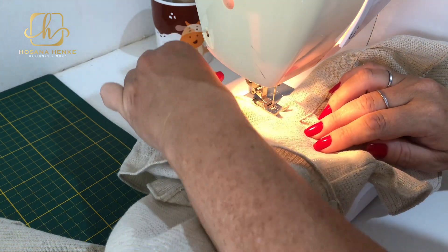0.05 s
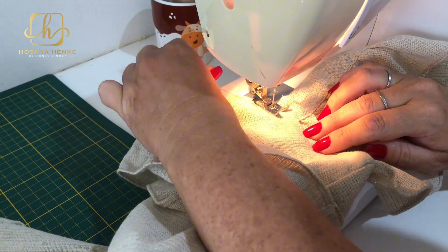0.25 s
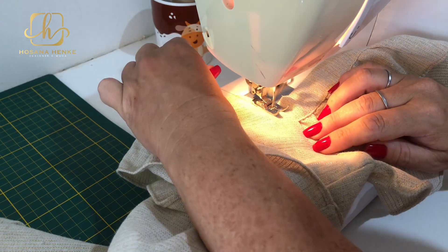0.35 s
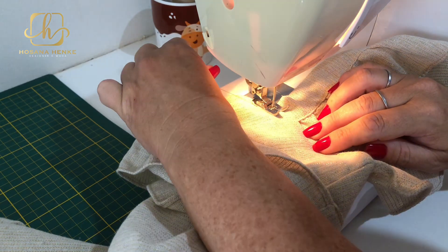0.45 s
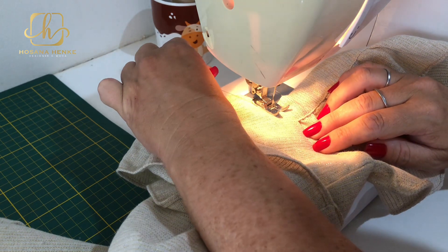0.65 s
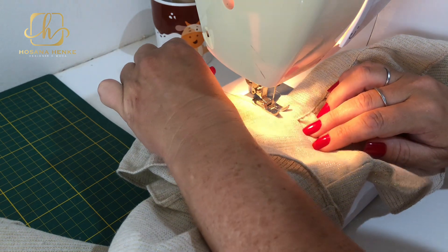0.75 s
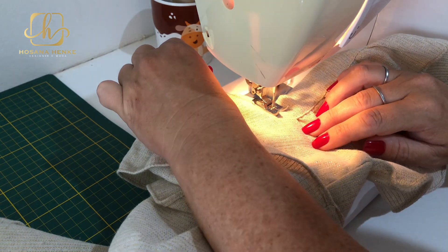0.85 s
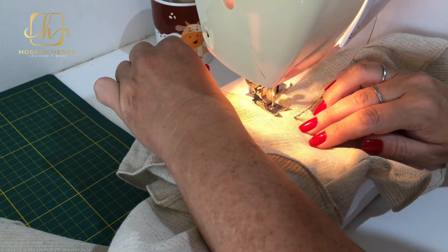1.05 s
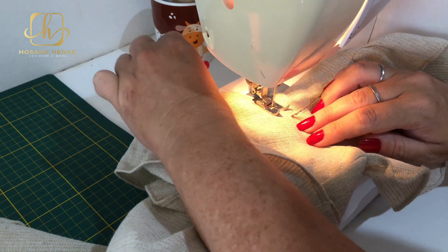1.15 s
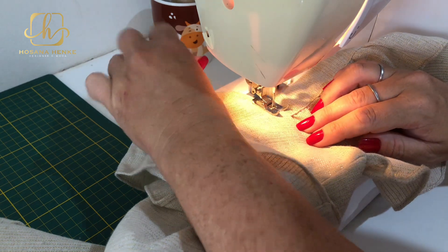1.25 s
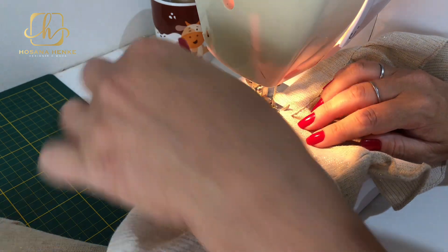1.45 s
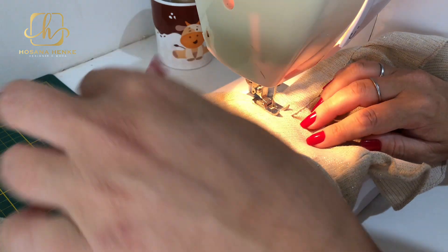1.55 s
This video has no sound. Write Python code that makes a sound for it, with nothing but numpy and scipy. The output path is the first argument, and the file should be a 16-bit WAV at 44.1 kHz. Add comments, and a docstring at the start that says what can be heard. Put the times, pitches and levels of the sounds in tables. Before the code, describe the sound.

Close up in a small room, a sewing machine sews two short bursts, its gears rattling and the table rumbling. The second burst starts with a tiny squeak and adds quick needle clacks and fabric hiss before slowing.

```python
"""A domestic sewing machine on a table sews two short runs, close by in a small room.
It hums at rest; in a run the drive shakes the table, gears chatter in the plastic housing,
the motor whines and fabric rubs. The feed knocks, the linkage clicks and small steel parts tick.
In the second run a dry bearing squeaks and the needle bar clacks, about ten stitches a second."""
import sys
import numpy as np
from scipy import signal
from scipy.fft import rfft, irfft, next_fast_len
from scipy.io import wavfile
from scipy.ndimage import uniform_filter1d, map_coordinates

SR = 44100
rng = np.random.default_rng(int(sys.argv[2]) if len(sys.argv) > 2 else 0)


def digitize_waveform(pressure):
    """Quantize a signal to 16-bit integers and store it at the path in sys.argv[1].

    Rows of a 2-D input are taken as channels; values are limited to [-1, 1].
    """
    field = np.atleast_2d(pressure).T
    bounded = np.clip(field, -1, 1)
    quanta = np.round(bounded * 32767).astype(np.int16)
    wavfile.write(sys.argv[1], SR, quanta)


N = 70560  # 1.6 s


def amp(db):
    """Decibels to gain."""
    return 10 ** (np.asarray(db) / 20)


def unit(x):
    """Scale to rms 1."""
    return x / np.sqrt(np.mean(x ** 2) + 1e-20)


def along(points, hz):
    """Read (freq_hz, value) points on a log axis."""
    freqs, values = np.transpose(points)
    return np.interp(np.log(hz + 1), np.log(freqs + 1), values)


def fader(rows):
    """Gain per sample from (time_s, level_db) rows: silent before, fading after."""
    times, db = np.transpose(rows)
    t = np.arange(N) / SR
    return amp(np.interp(t, times, db, left=-120) - 150 * np.maximum(t - times[-1], 0))


def wobble(rate_hz):
    """A smooth random curve."""
    points = rng.standard_normal(int(N * rate_hz / SR) + 4)
    return map_coordinates(points, [np.arange(N) * rate_hz / SR])


def tone(pitch_hz):
    """A sine of rms 1 that follows a pitch per sample."""
    return np.sqrt(2) * np.sin(2 * np.pi * np.cumsum(pitch_hz) / SR)


def filtered(x, response):
    """Filter x by a gain per frequency."""
    size = next_fast_len(len(x) + SR // 4)
    return irfft(rfft(x, size) * response(np.fft.rfftfreq(size, 1 / SR)), size)[:len(x)]


def eq(x, points):
    """Shape x with (freq_hz, gain_db) points."""
    return filtered(x, lambda f: amp(along(points, f)))


def ring(x, modes):
    """Pass x through a body's resonances."""
    def response(f):
        return sum((-1) ** k * amp(db) * 1j * f * width / (hz * hz - f * f + 1j * f * width)
                   for k, (hz, width, db) in enumerate(modes))
    return filtered(x, response)


def contacts(rate_hz, spread_db):
    """Small impacts of uneven size, one at a random moment of each period."""
    slots = np.arange(int(N * rate_hz / SR))
    onsets = ((slots + rng.random(len(slots))) * SR / rate_hz).astype(int)
    sizes = amp(spread_db * rng.standard_normal(len(slots))) * rng.choice([-1, 1], len(slots))
    return np.bincount(onsets, sizes, N)[:N]


def steady(x, window_s):
    """Even out the slow swells of x to rms 1."""
    power = abs(uniform_filter1d(x * x, max(int(window_s * SR), 8)))
    return x / np.sqrt(power + 1e-12)


def burst(attack_s, hold_s, t60_s):
    """The noisy chatter of one blow."""
    t = np.arange(SR // 8) / SR
    envelope = (1 - np.exp(-t / attack_s)) * amp(-60 * np.maximum(t - hold_s, 0) / t60_s)
    return rng.uniform(-0.83, 1, len(t)) * envelope


def struck(modes):
    """One blow on a body's modes, their balance varying from hit to hit."""
    t = np.arange(SR // 4) / SR
    rings = sum(amp(db + rng.normal(0, 0.71)) * np.exp(-np.pi * width * t)
                * np.sin(2 * np.pi * (hz * t + rng.random())) for hz, width, db in modes)
    return rings * (1 - np.exp(-t / 0.0035))


def place(out, start_s, db, blow):
    """Mix in a blow whose energy equals that level held for 10 ms."""
    part = out[round(start_s * SR):][:len(blow)]
    part += (amp(db) * blow * np.sqrt(SR / 100) / np.linalg.norm(blow))[:len(part)]


# resting hum: pitch_hz, level_db
HUM_TONES = [(100, -59.5), (465, -74.5)]
# dark room tone: freq_hz, gain_db
ROOM_TONE_EQ = [(30, -10), (60, 6), (130, 8.5), (200, 2), (470, 3), (2000, -8), (8000, -20.5),
                (14000, -20.5)]
# fader ride on both: time_s, gain_db
IDLE_RIDE = [(0, 1.5), (1.4, -16.5), (1.6, -2.5)]


def idle():
    """Mains hum of the resting machine over a bed of room tone."""
    t = np.arange(N) / SR
    hum = sum(amp(db) * np.sqrt(2) * np.sin(2 * np.pi * hz * t + 0.29 * wobble(9.4))
              for hz, db in HUM_TONES)
    room_tone = amp(-63.5) * unit(eq(rng.standard_normal(N), ROOM_TONE_EQ))
    return fader(IDLE_RIDE) * (hum + room_tone)


# ride on the sliding hiss: time_s, level_db
SLIDE_RIDE = [(0.18, -68), (0.202, -74.5), (0.226, -55.5), (0.258, -61.5), (0.412, -51.5), (0.488, -51),
              (0.5, -57), (.58, -59), (0.63, -72.5), (0.752, -49), (0.856, -49.5), (0.998, -44.5),
              (1.026, -51.5), (1.058, -44), (1.112, -49.5), (1.144, -44), (1.298, -53.5), (1.41, -71),
              (1.6, -80)]
# bright rub: freq_hz, gain_db
RUB_EQ = [(700, -23), (2000, 6.5), (4500, 4.5), (10000, -3.5), (14200, -2)]
# steel jingle: pitch_hz, width_hz, gain_db
JINGLE_MODES = [(4370, 90, 6.5), (4920, 380, 3), (6240, 230, 2.5), (8170, 300, 4.5), (13100, 360, 1)]


def sliding():
    """Gritty hiss of thread and fabric, with small steel parts jingling in it."""
    grit = unit(contacts(rate_hz=3000, spread_db=4.5)) + 0.68 * rng.standard_normal(N)
    jingle = unit(ring(contacts(rate_hz=670, spread_db=4.5), JINGLE_MODES))
    flutter = amp(1.93 * wobble(90.05) + 1.3)
    return fader(SLIDE_RIDE) * flutter * (unit(eq(grit, RUB_EQ)) + amp(-8.5) * jingle)


# clicks as the load is taken up or let go: start_s, level_db
LINKAGE_HITS = [(.2123, -52.5), (.2233, -43), (.2856, -48.5), (.6568, -55), (1.4465, -53)]
# ring of the linkage: pitch_hz, width_hz, gain_db
LINKAGE_MODES = [(348, 31, -8), (483, 13, -2.5), (741, 26, -0.5), (824, 19, -4.5), (1206, 55, 5),
                 (1598, 56, 1), (2432, 33, -1.5), (3020, 44, -5.5), (3558, 63, 3.5)]


def linkage_clicks():
    """Slack in the linkage closes with a click that rings on."""
    out = np.zeros(N)
    for start_s, db in LINKAGE_HITS:
        place(out, start_s, db + 0.5, struck(LINKAGE_MODES))
        click = eq(burst(0.00014, 0.0013, t60_s=0.12), [(1800, 1.5), (6000, -19)])
        place(out, start_s, db - 0.5, click)
    return out


# ride on the drive's effort: time_s, level_db
DRIVE_RIDE = [(.22, -59), (.278, -51.5), (.292, -44.5), (.40, -39), (.485, -38), (.53, -51), (.63, -56),
              (.675, -55), (.735, -41), (.82, -37.5), (.89, -40), (.95, -38), (1.0, -38), (1.08, -33.5),
              (1.11, -41.5), (1.16, -36.5), (1.25, -38.5), (1.34, -50), (1.47, -55.5), (1.6, -76.5)]
# boxy plastic housing: pitch_hz, width_hz, gain_db
HOUSING_MODES = [(271.5, 21, -5.5), (349, 41, -1.5), (431, 47, -5), (512.4, 35, -5), (676, 84, 0),
                 (902, 83, -2), (1132, 150, -5.5), (1490, 170, -11), (1820, 104, -7.5), (3010, 94, -17.5),
                 (3398, 70, -13.5)]
# loose rattle: freq_hz, gain_db
RATTLE_EQ = [(100, 4.5), (200, 7), (1200, -13), (2500, -7.5), (5000, -23.5), (16000, -38)]


def drive_chatter():
    """Gear teeth chatter into the housing and loose parts rattle with them."""
    teeth = unit(ring(contacts(rate_hz=900, spread_db=4.0), HOUSING_MODES))
    rattle = unit(eq(contacts(rate_hz=1400, spread_db=2.5), RATTLE_EQ))
    return amp(-2) * fader(DRIVE_RIDE) * steady(teeth + amp(-6) * rattle, window_s=0.036)


# ride on the shaking table: time_s, level_db
SHAKE_RIDE = [(.275, -64), (.33, -37), (.43, -35.5), (.5, -37), (.535, -45), (.6, -49.5), (.665, -60),
              (.73, -40.5), (.81, -40.5), (.845, -32), (.905, -40), (.935, -34.5), (.96, -42),
              (1.02, -33.5), (1.08, -34), (1.115, -45), (1.18, -36), (1.32, -39.5), (1.37, -46.5),
              (1.43, -55.5), (1.465, -48.5), (1.5, -62), (1.6, -62)]
# boom of the table: pitch_hz, width_hz, gain_db
TABLE_MODES = [(59, 4.7, -13.5), (97.8, 10.6, -4), (124, 14.5, -4.5), (183.6, 12.3, -7)]


def table_rumble():
    """The swinging mechanism thumps the table's low modes."""
    thumps = ring(contacts(rate_hz=220, spread_db=1.5), TABLE_MODES)
    rumble = ring(thumps, [(109, 105, 0)])  # broad band-pass
    return amp(-4) * fader(SHAKE_RIDE) * steady(rumble, window_s=0.0444)


# motor tones: low_pitch_hz, high_pitch_hz
MOTOR_PITCHES = [279, 432.3]
# their rides: time_s, low_level_db, high_level_db
MOTOR_RIDES = [(0.281, -66, -65), (.32, -47, -50.5), (0.509, -52, -43.5), (.55, -54.5, -63),
               (.64, -69, -69), (.762, -46.5, -51.5), (.822, -72, -59), (.896, -39.5, -44),
               (.956, -54, -75), (.985, -64, -46.5), (1.094, -50, -41), (1.16, -51, -48), (1.35, -56, -60)]


def motor_drone():
    """The motor sustains two wavering tones in the housing."""
    times, *rides = np.transpose(MOTOR_RIDES)
    out = np.zeros(N)
    for hz, db in zip(MOTOR_PITCHES, rides):
        flutter = amp(2.2 * wobble(110) - 1)
        out += fader(np.transpose([times, db])) * flutter * tone(hz + 24 * wobble(130))
    return out


# feed knocks: start_s, level_db, pitch_ratio
FEED_HITS = [(0.29, -47, .85), (.352, -32.5, 0.96), (.372, -43, 1.1), (.743, -51, 1.13), (.8065, -36, 0.96),
             (1.003, -37, .99), (1.048, -35, 0.91), (1.071, -43, 0.73), (1.167, -34.5, 0.99),
             (1.185, -32, 0.836), (1.238, -39, 0.87), (1.29, -45, .99)]
# body of a knock: pitch_hz, width_hz, gain_db
FEED_MODES = [(652, 74, -6.5), (920, 47, -8), (1121, 99, 7)]


def feed_knocks():
    """The fabric feed knocks: a dull ring with a soft noisy edge."""
    out = np.zeros(N)
    for start_s, db, ratio in FEED_HITS:
        body = struck([(hz * ratio, width, gain) for hz, width, gain in FEED_MODES])
        edge = eq(burst(0.00059, 0.007, t60_s=0.018), [(1400, -9), (8000, -32)])
        place(out, start_s, db - 2, body)
        place(out, start_s, db - 10.5, edge)
    return out


# ride on the whine: time_s, level_db
WHINE_RIDE = [(.3, -72), (.47, -58.5), (.7, -88), (.81, -52), (.935, -54.5), (1.06, -67), (1.125, -50.5),
              (1.3, -79)]


def motor_whine():
    """A thin, wavering motor tone that swells in both runs."""
    flutter = amp(1.3 * wobble(120))
    pitch_hz = 3472 + 40.2 * wobble(40) + 25 * wobble(300)
    return fader(WHINE_RIDE) * flutter * tone(pitch_hz)


# steel ticks: start_s, level_db, treble_tilt_db_per_octave
TICK_HITS = [(.352, -44.5, -2.5), (.4021, -37.5, -1.5), (.44, -46, 8), (.4517, -40, -5.5),
             (.7045, -43.5, -8), (.754, -37.5, 13), (.907, -51, 19), (.992, -37, 10), (1.053, -30, 26),
             (1.08, -46, 2), (1.221, -46, 2), (1.2599, -38, -8.5), (1.383, -58, 3), (1.5374, -63, -8.5)]
# bright steel ring: pitch_hz, width_hz, gain_db
TICK_MODES = [(4700, 260, 6.5), (5500, 280, 3.5), (6350, 440, 3.5), (7870, 110, 8), (10300, 500, 1.5)]
# snap of the contact: freq_hz, gain_db
SNAP_EQ = [(1000, 3), (3000, 2), (16000, 0)]


def steel_ticks():
    """Small steel parts tick, each with its own brightness."""
    out = np.zeros(N)
    for start_s, db, tilt in TICK_HITS:
        steel = unit(ring(burst(0.0006, 0.0021, t60_s=0.017), TICK_MODES))
        snap = unit(eq(burst(0.00068, 0.0033, t60_s=0.017), SNAP_EQ))
        tick = filtered(steel + snap, lambda f: amp(tilt * np.log2(np.maximum(f, 3000) / 6000)))
        place(out, start_s, db - 4, tick)
    return out


# thin pings: start_s, pitch_hz, level_db
PING_HITS = [(0.4033, 4640, -49.5), (0.4496, 5720, -52)]


def steel_pings(width_hz=110):
    """Single steel parts ring briefly at one pitch."""
    out = np.zeros(N)
    for start_s, hz, db in PING_HITS:
        place(out, start_s, db, struck([(hz, width_hz, 0)]))
    return out


# squeaks into the second run: start_s, length_s, start_hz, end_hz, level_db
BEARING_SQUEAKS = [(0.687, 0.036, 1966, 1900, -46.5), (0.766, 0.028, 3306, 2570, -39.5)]


def bearing_squeaks(roughness=0.0536):
    """Short, rough, falling squeaks of a dry bearing."""
    out = np.zeros(N)
    for start_s, length_s, start_hz, end_hz, db in BEARING_SQUEAKS:
        progress = np.clip((np.arange(N) / SR - start_s) / length_s, 0, 1)
        pitch_hz = np.interp(progress, [0, 1], [start_hz, end_hz]) * (1 + roughness * wobble(700))
        out += amp(db) * np.sin(np.pi * progress) * np.sin(2 * np.pi * np.cumsum(pitch_hz) / SR)
    return out


# ride on the gear hum: time_s, pitch_hz, level_db
GEAR_RIDE = [(0.723, 686, -69), (0.743, 643, -40), (0.784, 642.2, -60), (0.809, 617.7, -40.5),
             (0.851, 696.7, -49), (0.954, 675.5, -65), (0.966, 708, -32.5), (.99, 621.3, -41.5),
             (1.035, 607, -46), (1.055, 648, -42), (1.11, 609, -69), (1.147, 695, -36), (1.168, 630, -45),
             (1.19, 610.6, -37), (1.217, 731, -58), (1.25, 639, -36), (1.33, 623, -77)]


def gear_hum():
    """A rough gear tone that sags as each stitch loads the shaft."""
    times, hz, db = np.transpose(GEAR_RIDE)
    pitch_hz = np.interp(np.arange(N) / SR, times, hz) + 36 * wobble(350)
    flutter = amp(2.3 * wobble(200) - 2)
    return fader(np.transpose([times, db])) * flutter * tone(pitch_hz)


# needle bar clacks: start_s, level_db, boom_db, crack_db
CLACK_HITS = [(.742, -32.5, -0.5, -11.5), (.8635, -35, -7, -0.5), (.9635, -31, 2, -5.5),
              (1.049, -37.5, 3, -10), (1.1427, -31, -3, -6)]
# ring of the bar: pitch_hz, width_hz, gain_db
BAR_MODES = [(434, 180, 1.5), (707, 73, 6.5), (995, 52, 6), (1425, 264, -3), (1825, 160, -6.5),
             (2870, 1250, -14.5), (4390, 130, -3.5), (4810, 246, -5)]
# hard crack: freq_hz, gain_db
CRACK_EQ = [(200, -25), (600, 5), (2000, 6), (6000, -30), (10000, -9.5), (16000, -28)]


def needle_clacks():
    """The needle bar strikes and rings, with housing boom below and a crack on top."""
    out = np.zeros(N)
    for start_s, db, boom_db, crack_db in CLACK_HITS:
        bar = ring(burst(0.0018, 0.006, t60_s=0.043), BAR_MODES)
        body = unit(eq(bar, [(750, boom_db), (950, 0)]))
        crack = unit(eq(burst(0.0024, 0.0047, t60_s=0.033), CRACK_EQ))
        place(out, start_s, db, body + amp(crack_db) * crack)
    return out


# small-room reverb: freq_hz, t60_s
ROOM_DECAY = [(100, 0.44), (1000, 0.3), (4000, 0.23), (15000, 0.27)]


def room(send):
    """A short diffuse tail that lingers longest in the bass."""
    hz, t, noise = signal.stft(rng.standard_normal(SR // 2), SR, nperseg=256)
    decay = amp(-60 * t / along(ROOM_DECAY, hz)[:, None])
    tail = signal.istft(noise * decay, SR, nperseg=256)[1]
    return signal.fftconvolve(send, np.pad(tail, (180, 0)) / np.linalg.norm(tail))[:N]


def scene():
    """Mono mix: wetter hits, drier running noise; rumble and idle get no reverb."""
    running = drive_chatter() + motor_drone() + gear_hum() + motor_whine()
    running += sliding() + bearing_squeaks()
    hits = needle_clacks() + feed_knocks() + steel_ticks() + steel_pings() + linkage_clicks()
    reverb = room(amp(-6) * hits + amp(-17) * running)
    return (running + hits + reverb + table_rumble() + idle())[None]


# microphone colour: freq_hz, gain_db
MIC_EQ = [(20, -27), (36, -29), (52, 1.5), (15000, -1), (15450, 4)]


def record(dry, top_hz=15850):
    """The microphone cuts the sub-bass and lifts the treble just under the band limit."""
    return np.array([filtered(eq(channel, MIC_EQ), lambda hz: hz < top_hz) for channel in dry])


dry = scene()
out = record(dry)
digitize_waveform(out)
```